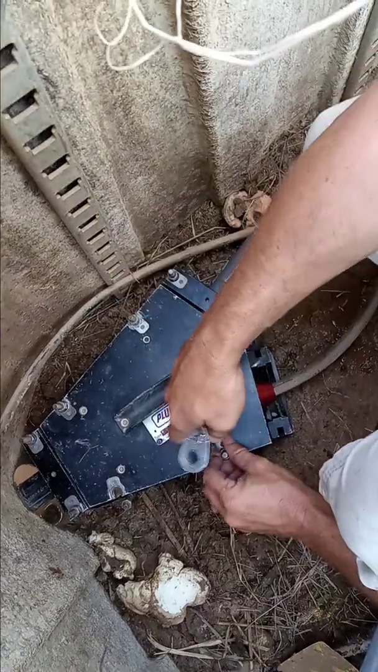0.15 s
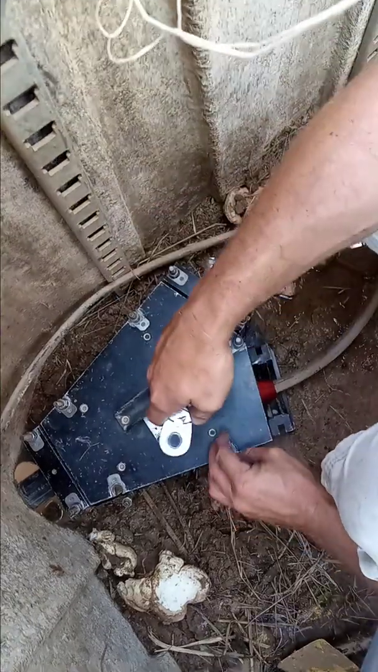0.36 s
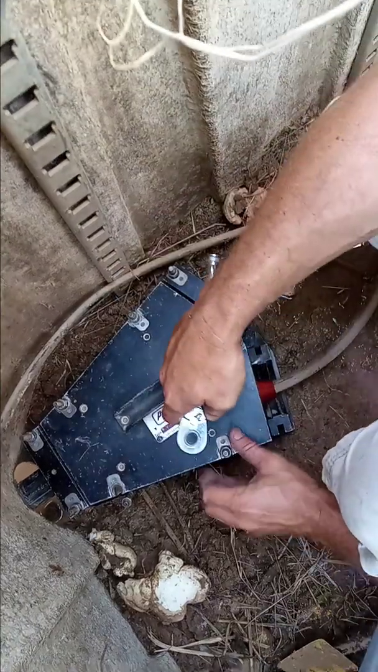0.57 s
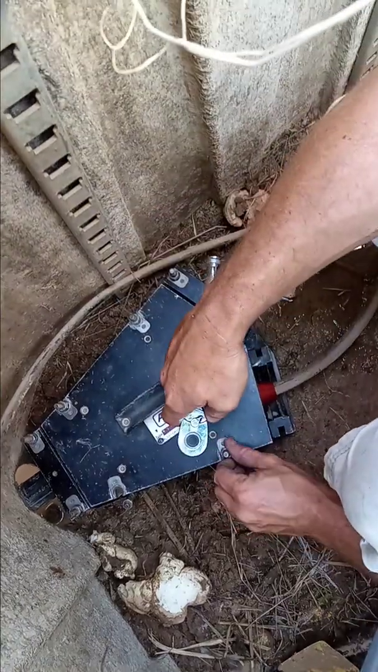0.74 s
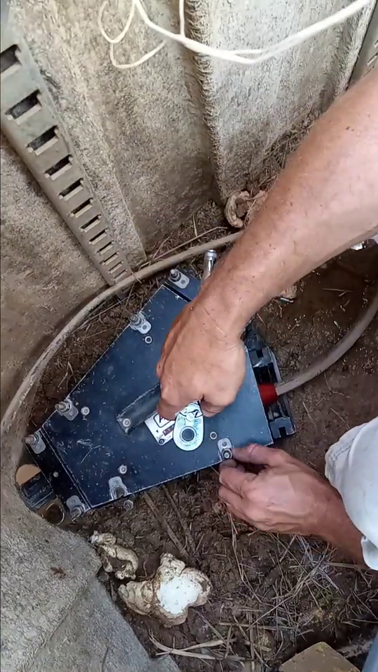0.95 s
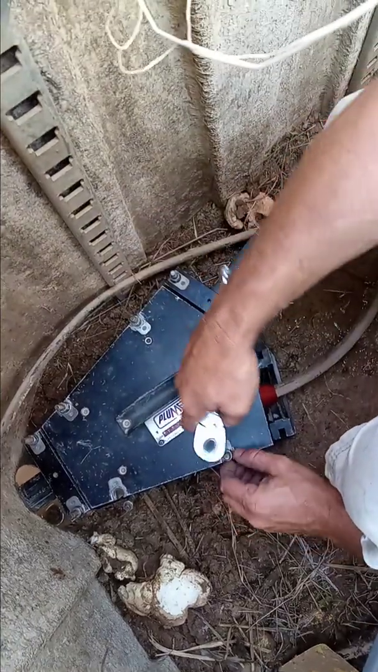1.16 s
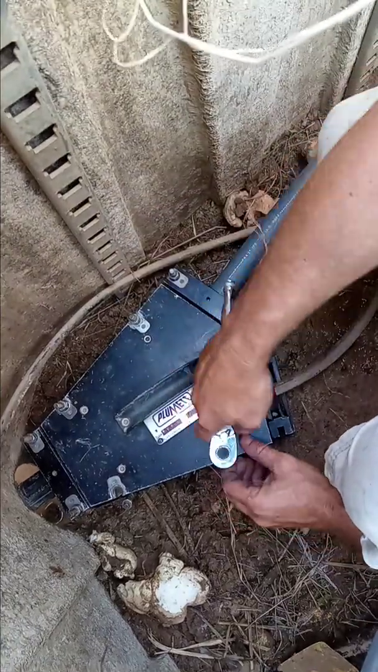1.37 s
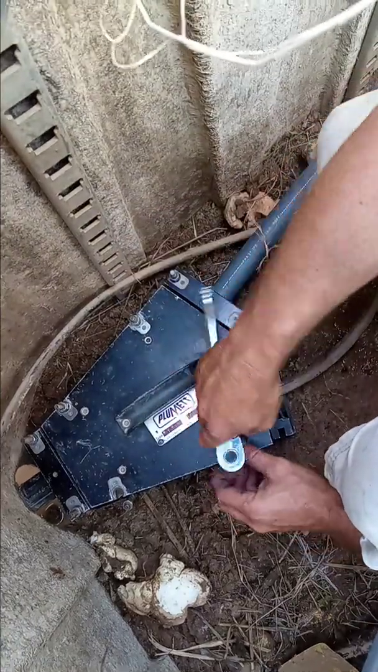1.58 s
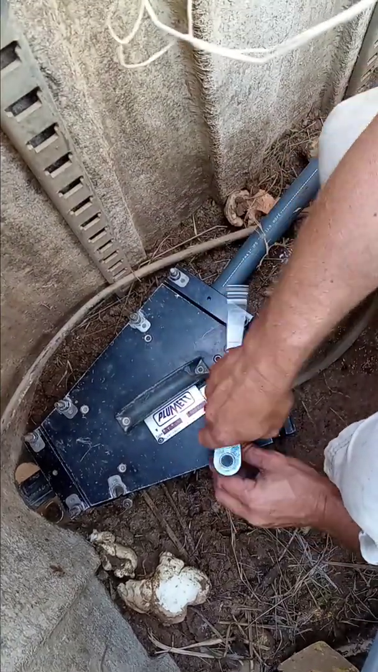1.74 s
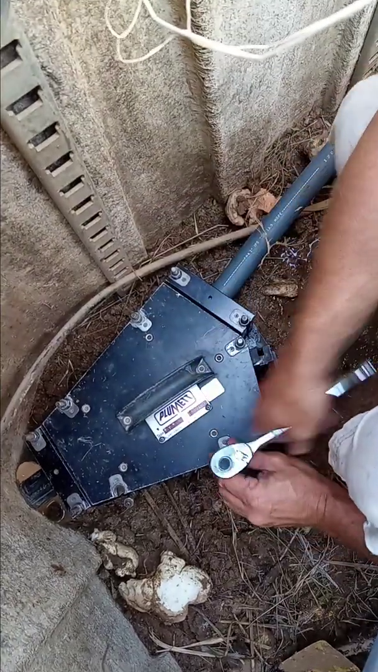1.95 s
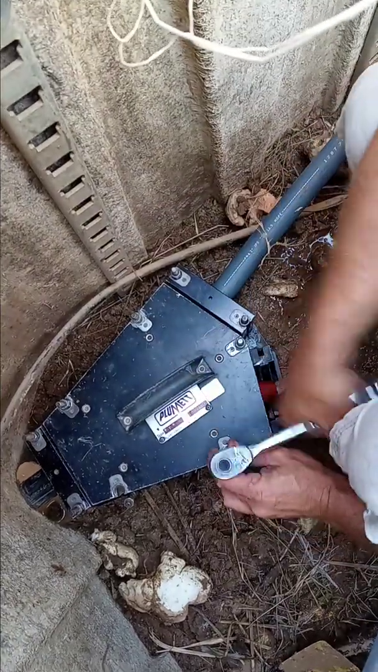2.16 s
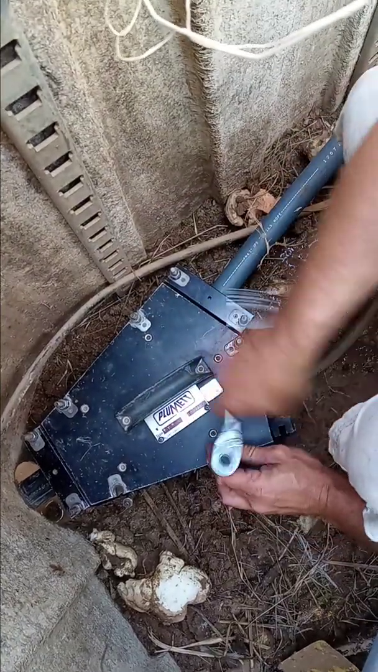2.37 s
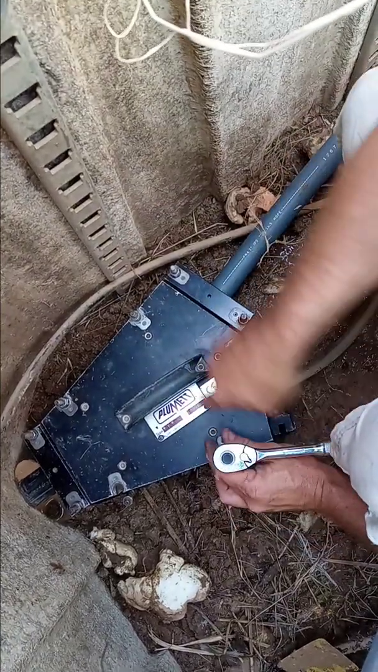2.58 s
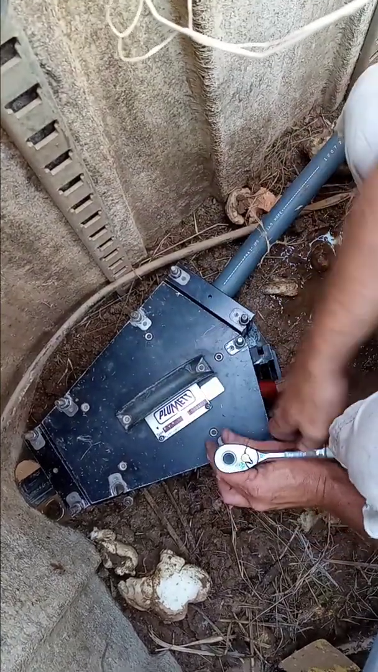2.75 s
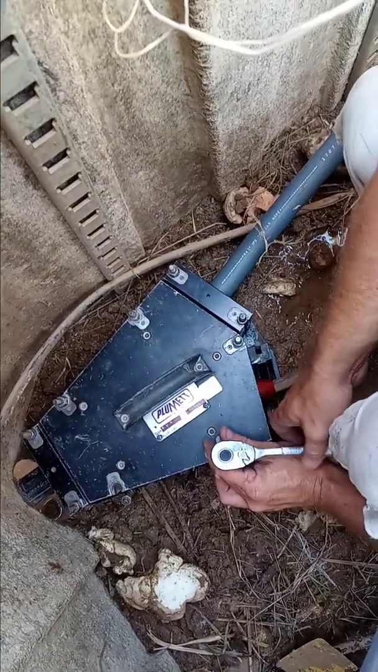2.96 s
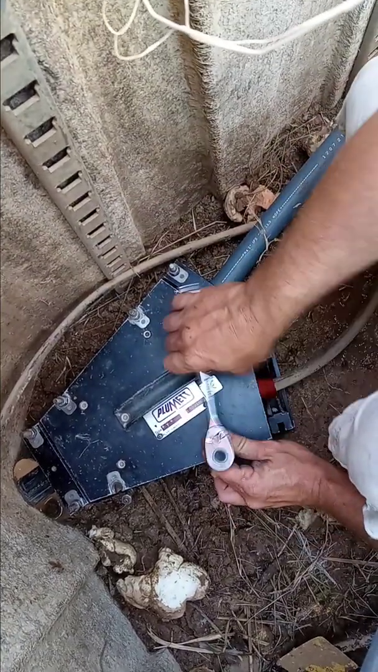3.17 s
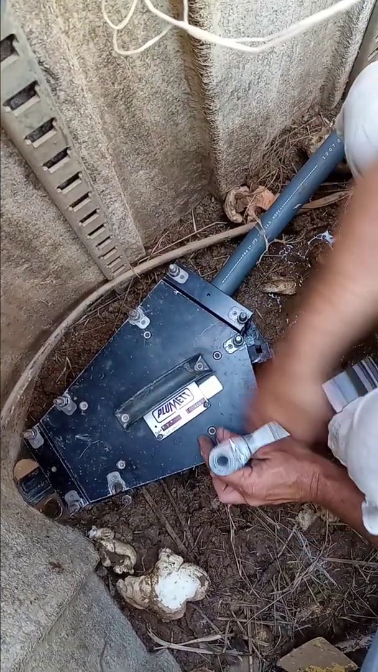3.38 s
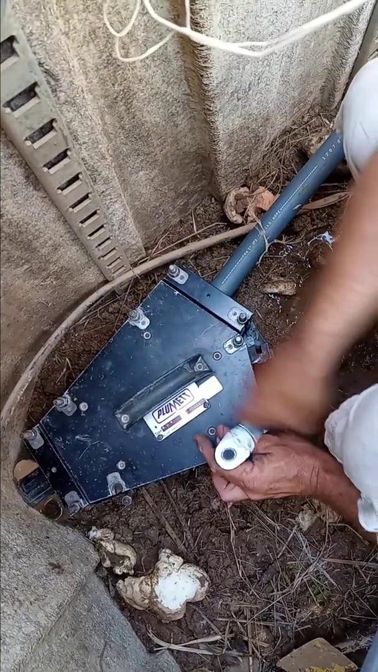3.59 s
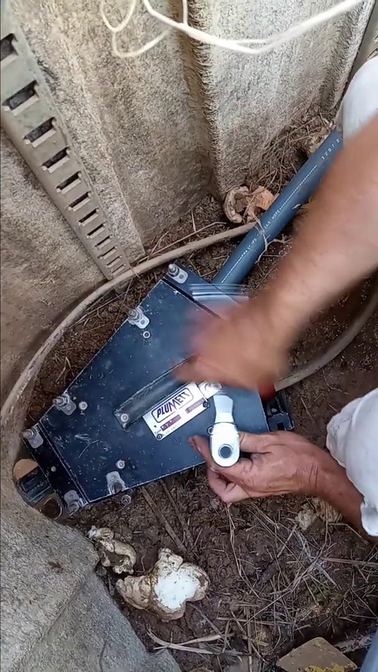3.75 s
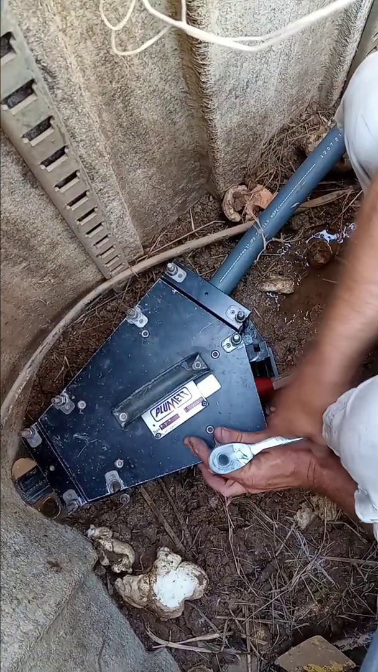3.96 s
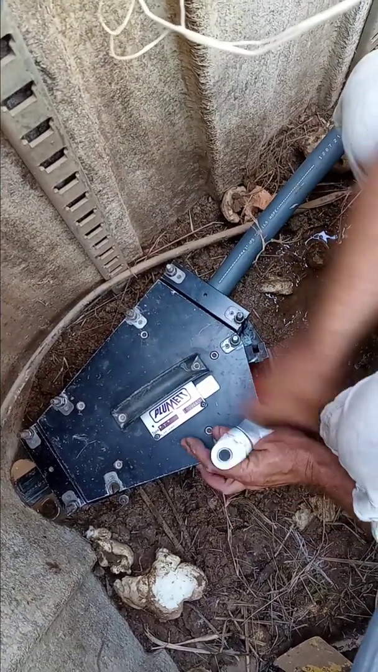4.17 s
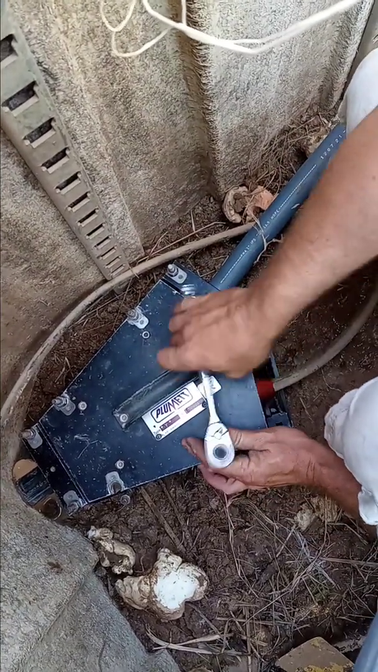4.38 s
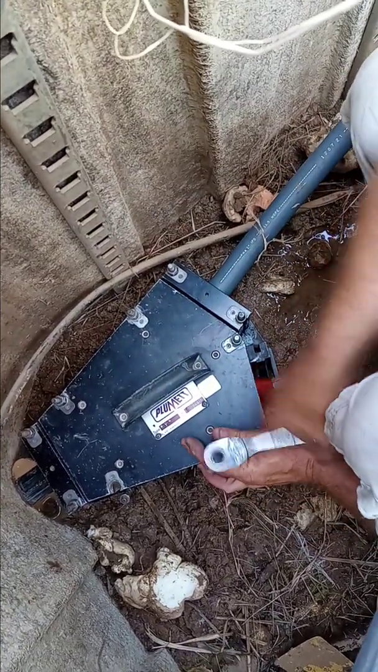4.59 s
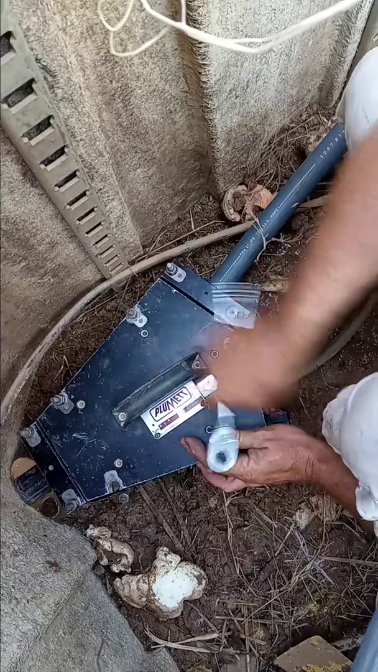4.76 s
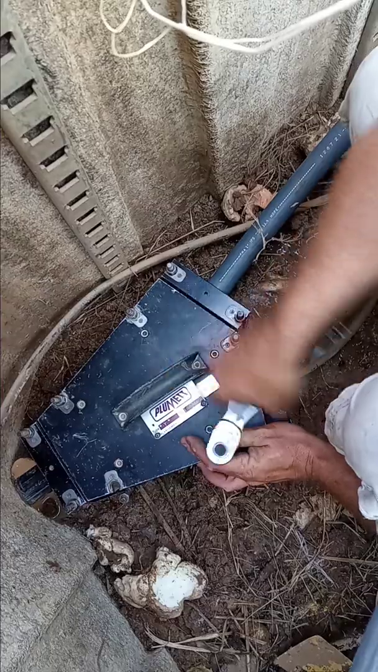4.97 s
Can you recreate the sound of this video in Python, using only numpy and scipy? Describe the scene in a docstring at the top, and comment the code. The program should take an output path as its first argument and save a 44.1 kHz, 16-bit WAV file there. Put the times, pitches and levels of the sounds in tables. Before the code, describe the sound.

A socket clinks and knocks a few times as it is fitted onto a bolt in a machine's lid. Then a hand ratchet starts working, each back swing a short, bright buzz of clicks, with metallic clanks and taps between. The strokes quicken into a steady rhythm. It is heard from just above a narrow outdoor pit, with a slight echo and a faint low drone.

```python
"""Socket ratchet in a pit

A ratchet tightens a bolt on the lid of a machine housing in a narrow pit, heard from a phone above.
The socket clinks onto the bolt, then the handle swings to and fro: the pawl buzzes over the teeth on
each back swing, speeding up and slowing with the hand, and the tool knocks on the lid on each drive
stroke. The pit adds a short echo and a low drone. Two microphone ports colour the sound differently."""
import sys
import numpy as np
from scipy import signal
from scipy.fft import rfft, irfft
from scipy.io import wavfile
from scipy.ndimage import uniform_filter1d

SR = 44100
rng = np.random.default_rng(int(sys.argv[2]) if len(sys.argv) > 2 else 0)


def wav_out(sig):
    """Save sig, one row per channel (or a flat mono array), as 16-bit PCM at SR to the path in sys.argv[1]."""
    wavfile.write(sys.argv[1], SR, np.round(np.clip(np.atleast_2d(sig).T, -1, 1) * 32767).astype(np.int16))


N = 221508
TIME = np.arange(N) / SR


def amp(db):
    return 10 ** (np.asarray(db) / 20)


def unit_energy(x):
    """Scale to a mean energy of one per channel."""
    return x / np.sqrt(np.mean(np.sum(x ** 2, axis=-1)))


def unit_rms(x):
    return x / np.std(x)


def add(track, start_s, sound):
    """Mix a sound into the track."""
    i = max(int(start_s * SR), 0)
    part = sound[..., :max(N - i, 0)]
    track[:, i:i + part.shape[-1]] += part


def convolve(x, impulse):
    """Filter each channel, keeping its length."""
    return signal.fftconvolve(np.atleast_2d(x), np.atleast_2d(impulse), axes=-1)[:, :np.shape(x)[-1]]


def response(spectrum, size=4096):
    """Minimum-phase impulse response from rows of freq_hz, gain_db."""
    hz, db = np.transpose(spectrum)
    bins_hz = np.fft.rfftfreq(size, 1 / SR)
    gain = amp(np.interp(np.log(bins_hz + 1), np.log(hz), db))
    cepstrum = irfft(np.log(gain))
    cepstrum[1:size // 2] *= 2
    cepstrum[size // 2 + 1:] = 0
    return irfft(np.exp(rfft(cepstrum)))[:size // 2]


def resonance(x, hz, width_hz):
    """Two-pole band-pass, unity gain at the centre."""
    return signal.lfilter(*signal.iirpeak(hz, hz / width_hz, fs=SR), x)


def narrow_band(x, hz, width_hz):
    """Two equal resonances in series."""
    return resonance(resonance(x, hz, width_hz), hz, width_hz)


def noise_pair(apart, size):
    """Noise at the two ports: a shared part plus one of their own, scaled by apart."""
    shared, *own = rng.standard_normal((3, size))
    return shared + apart * np.array(own)


def wander(rate_hz):
    """Smooth random drift, unit spread."""
    knots = rng.standard_normal(N // 20)
    return unit_rms(np.interp(TIME * rate_hz, np.arange(len(knots)), knots))


def gate(start_s, end_s):
    """Soft-edged on/off window."""
    return uniform_filter1d(1. * ((TIME > start_s) & (TIME < end_s)), size=3500)


def swells(table, width_hz, gain_db):
    """Resonances driven briefly by noise, faded in and out."""
    out = np.zeros((2, N))
    for start_s, pitch_hz, level_db, length_s in table:
        tone = narrow_band(rng.standard_normal(SR // 4), pitch_hz, width_hz)[-int(length_s * SR):]
        fade = signal.windows.tukey(len(tone), .5)
        add(out, start_s, amp(level_db + gain_db) * unit_rms(tone * fade))
    return out


def burst(t60_s, apart, rise_s, echo_db=-14, echo_t60_s=.07, size=3000):
    """A cloud of short-lived modes, trailed by dense echoes off the close walls."""
    t = TIME[:size]
    decay = np.hypot(amp(-60 * t / t60_s), amp(echo_db - 60 * t / echo_t60_s))
    return noise_pair(apart, size) * decay * (1 - np.exp(-t / rise_s))


def strike(blow, spectrum, lead_hz, width_hz, lead_db):
    """A blow coloured by the struck part, with one resonance leading."""
    sound = convolve(blow, response(spectrum))
    lead = unit_energy(narrow_band(sound, lead_hz, width_hz))
    return unit_energy(unit_energy(sound) + amp(lead_db) * lead)


# Open-air spectrum: freq_hz, gain_db
AIR_SPECTRUM = [(20, -39), (45, -8), (80, -3), (110, 5), (170, 1), (300, -7), (700, -17), (1500, -24),
                (3000, -31.5), (5000, -40.5), (6500, -38.5), (10000, -38), (16000, -45)]

def air(level_db=-53, flutter_db=.7):
    """Faint, even outdoor background."""
    flutter = amp(flutter_db * wander(rate_hz=5))
    noise = convolve(noise_pair(apart=1, size=N), response(AIR_SPECTRUM))
    return unit_rms(noise) * amp(level_db) * flutter


# Drone envelope: time_s, level_db
DRONE_LEVELS = [(0, -46.5), (.28, -42), (1.2, -40.5), (1.9, -49.5), (2.7, -41), (3.5, -49.5), (5.02, -47)]
# Booms in the drone: peak_s, rise_db, length_s
DRONE_BOOMS = [(1.566, 12, 0.084), (2.417, 15, 0.076), (2.527, 11, 0.076), (3.184, 16.5, 0.043),
               (3.35, 14, 0.1), (3.789, 19, 0.032), (4.549, 18.5, 0.064)]

def drone(low_hz=66, high_hz=78, high_db=-5, width_hz=9):
    """Outdoor rumble, narrowed in the pit to two wandering tones that beat."""
    def tone(hz):
        band = narrow_band(rng.standard_normal(N), hz, width_hz)
        return np.cos(np.angle(signal.hilbert(band)))
    level_db = np.interp(TIME, *np.transpose(DRONE_LEVELS))
    for peak_s, rise_db, length_s in DRONE_BOOMS:
        level_db += rise_db * np.exp(-2 * ((TIME - peak_s) / length_s) ** 2)
    return unit_rms(tone(low_hz) + amp(high_db) * tone(high_hz)) * amp(level_db)


def pit(x, level_db=-28, t60_s=.25, rise_s=.0047, size=20000):
    """Add faint, dull reverberation between the pit walls."""
    t = TIME[:size]
    tail = noise_pair(apart=.22, size=size) * amp(-60 * t / t60_s) * (1 - np.exp(-t / rise_s))
    dull_tail = convolve(tail, response([(300, 2.5), (4000, -2), (12000, -50)]))
    return x + amp(level_db) * convolve(x, unit_energy(dull_tail))


# Housing thumps: start_s, pitch_hz, relative_db, length_s
HOUSING_THUMPS = [(0.991, 193, -47, 0.097), (1.368, 346, -40, 0.084), (1.869, 320, -41, 0.1),
                  (2.346, 315, -36.5, 0.038), (2.504, 271, -40, 0.1), (3.381, 494, -27, 0.041),
                  (3.57, 320, -41.5, 0.073), (4.157, 302, -46.5, 0.09), (4.465, 219, -28.5, 0.07),
                  (4.517, 239, -32.5, 0.042)]

def thumps():
    """The hollow housing shifts on its bed."""
    return swells(HOUSING_THUMPS, width_hz=90, gain_db=-2)


# Lid and housing modes: pitch_hz, width_hz, gain_db
LID_MODES = [(503.6, 55, 15.5), (806, 165, -5.5), (1133, 38, 5.5), (1872, 19, 3.5), (2407, 44, -2),
             (3374, 100, -4.5)]

def lid(x):
    """The bolt carries the tool's sound into the lid, which adds its resonances."""
    return x + sum(amp(db) * resonance(x, hz, width_hz) for hz, width_hz, db in LID_MODES)


# Tool squeaks: start_s, pitch_hz, relative_db, length_s
TOOL_SQUEAKS = [(0.001, 2720, -60.5, 0.13), (3.180, 3800, -51.5, 0.029), (3.384, 3890, -40, 0.0126),
                (4.254, 3760, -47, 0.045)]

def squeaks():
    """Socket and wrench head squeak as they turn."""
    return swells(TOOL_SQUEAKS, width_hz=65, gain_db=1.5)


# Spells of friction: start_s, end_s, hiss_relative_db, body_relative_db
RUB_SPELLS = [(0, 0.18, -56.5, -62.5), (1.938, 2.13, -54.5, -50), (2.125, 2.59, -51.5, -52.5),
              (3.178, 5.02, -51.5, -47)]
# Friction hiss spectrum: freq_hz, gain_db
HISS_SPECTRUM = [(900, -16.5), (2000, 1.5), (3000, -6.5), (3700, -1.5), (5000, -12.5), (7000, -16),
                 (11000, -27), (16000, -24)]
# Lid body spectrum, rubbed or struck: freq_hz, gain_db
BODY_SPECTRUM = [(120, -45.5), (300, -3), (480, 1), (900, 6.5), (1300, -1), (2200, -46.5), (5000, -76)]

def rubbing(grain_db=2.3, hiss_gain_db=-2, body_gain_db=-4, swing_hiss_db=9, swing_body_db=5):
    """Grainy friction of thread and socket, louder on the quick back swings."""
    grains = noise_pair(apart=.85, size=N) * amp(grain_db * wander(rate_hz=260))
    swinging = sum(gate(start_s, end_s) for start_s, end_s, *_ in BACK_SWINGS)
    hiss = unit_rms(convolve(grains, response(HISS_SPECTRUM)))
    body = unit_rms(convolve(grains, response(BODY_SPECTRUM)))
    hiss *= amp(hiss_gain_db + swing_hiss_db * swinging)
    body *= amp(body_gain_db + swing_body_db * swinging)
    return sum(gate(start_s, end_s) * (amp(hiss_db) * hiss + amp(body_db) * body)
               for start_s, end_s, hiss_db, body_db in RUB_SPELLS)


# Steel head modes: pitch_hz, t60_s, relative_db
WRENCH_MODES = [(3700, 0.065, -11), (3762, 0.046, -11), (4615, 0.022, -19), (5760, 0.01, -18.5),
                (6635, 0.057, -11.5), (6540, 0.055, -42), (7074, 0.02, -14), (9580, 0.01, -14)]

def wrench_ring(detune=.004, rise_s=.0014, size=3000):
    """The steel head rings; grip and load shift its modes slightly from blow to blow."""
    hz, t60_s, db = np.transpose(WRENCH_MODES)[:, :, None]
    t = TIME[:size]
    hz = hz * (1 + detune * rng.standard_normal(hz.shape))
    modes = np.exp((2j * np.pi * hz - np.log(1000) / t60_s) * t) * (1 - np.exp(-t / rise_s))
    modes *= amp(db) / np.linalg.norm(modes.real, axis=1, keepdims=True)
    port_phases = np.exp(2j * np.pi * rng.random((2, len(hz))))
    return (port_phases @ modes).real


# Socket clank spectrum: freq_hz, gain_db
CLANK_SPECTRUM = [(500, -15), (1200, -3), (1900, -1.5), (2700, -5), (3400, -2.5), (4200, -12),
                  (7000, -20.5), (14000, -64)]
# Wrench tick spectrum: freq_hz, gain_db
TICK_SPECTRUM = [(2000, 13.5), (4500, 9), (6500, 11.5), (9000, 7), (12000, 5.5), (16000, -71)]

def knock(blow_db, tick_offset_db, clank_hz, clank_gain_db=13.5, tick_gain_db=8.5, ring_db=-2):
    """One blow thuds in the lid, clanks in the socket and ticks in the wrench."""
    thud_hz = 981 if rng.random() < .4 else 491  # one of the lid's two drum notes leads
    thud_burst = burst(t60_s=.059, apart=.37, rise_s=.00087)
    thud = strike(thud_burst, BODY_SPECTRUM, thud_hz, width_hz=110, lead_db=-8.5)
    clank_burst = burst(t60_s=.033, apart=1, rise_s=.00051, echo_db=-.5)
    clank = strike(clank_burst, CLANK_SPECTRUM, clank_hz, width_hz=1040, lead_db=-8)
    tick_burst = burst(t60_s=.048, apart=.79, rise_s=.0005)
    tick = unit_energy(convolve(tick_burst, response(TICK_SPECTRUM))) + amp(ring_db) * wrench_ring()
    metal = amp(clank_gain_db) * clank + amp(tick_offset_db + tick_gain_db) * tick
    # The thud is strongest under low clanks and grows more slowly with force than the clank.
    thud_db = 5.5 + .67 * blow_db - 20 * np.log2(clank_hz / 2000)
    return amp(thud_db) * thud + amp(blow_db) * metal


# Blows on bolt and lid, pitch set by the spot struck: start_s, blow_db, tick_offset_db, clank_hz
TOOL_BLOWS = [(0.4307, -26, -1, 1860), (0.4409, -32, -8, 1920), (0.633, -24.5, -25, 2180),
              (0.7845, -53.5, -30, 2160), (1.2023, -19, -17, 3200), (1.2317, -22.5, -7, 2300),
              (1.286, -17.5, -8.5, 2440), (1.3581, -28, -16, 1610), (1.5, -37.5, -37, 3200),
              (1.718, -34, -2.5, 2380), (1.8654, -13.5, -7.5, 2170), (2.3388, -26.5, -9, 2250),
              (2.365, -22, -16, 1920), (2.49, -31, 4.5, 3100), (2.4992, -22, -29, 1750),
              (3.2207, -30, -2, 1750), (3.248, -17, 0.5, 2190), (3.3071, -28, 10.5, 1600),
              (3.3445, -30.5, 3, 1600), (3.5035, -14, -8, 2330), (3.541, -31.5, -9, 1660),
              (3.566, -21, 5, 2370), (3.6039, -20.5, 2.5, 1780), (3.6529, -20.5, -1.5, 1698),
              (3.7908, -21, -32, 1850), (3.8262, -29.5, -10, 2200), (3.8518, -25.5, -0.5, 1630),
              (3.8589, -24.5, 9, 3060), (3.9158, -27, 6, 3500), (3.9525, -28.5, 9, 3830),
              (4.1064, -28, -28, 1720), (4.115, -23.5, 4.5, 3400), (4.1493, -20.5, 6.5, 3850),
              (4.157, -22, 7, 3400), (4.2036, -29.5, 12, 3600), (4.2511, -24.5, 0.5, 3520),
              (4.442, -23, -5, 3200), (4.4583, -20, 9, 3270), (4.5094, -29, 0, 1850),
              (4.5578, -26.5, 11.5, 2400), (4.6962, -21, -33, 2150), (4.7703, -18.5, 3, 3620),
              (4.813, -28.5, 0.5, 2050), (4.8909, -21, -25, 2000)]

def knocks(throw_fraction=.52):
    """Seating and drive-stroke knocks; each back swing also throws the loose socket against the bolt."""
    out = np.zeros((2, N))
    for start_s, blow_db, tick_offset_db, clank_hz in TOOL_BLOWS:
        add(out, start_s, knock(blow_db, tick_offset_db, clank_hz))
    for start_s, end_s, *_ in BACK_SWINGS:
        throw_s = start_s + throw_fraction * (end_s - start_s)
        add(out, throw_s, knock(blow_db=-25, tick_offset_db=-1, clank_hz=3400))
    return out


# Pawl snap spectrum: freq_hz, gain_db
SNAP_SPECTRUM = [(150, -24), (450, -2.5), (900, 2), (1500, -3), (3000, 6.5), (4600, -2.5), (6500, 2.5),
                 (9000, 6), (12000, 10.5), (16000, -6)]

def tooth(ring_db):
    """One drop of the pawl: a snap and the ring it leaves."""
    snap_burst = burst(t60_s=.012, apart=1, rise_s=.0008, echo_db=-13)
    snap = convolve(snap_burst, response(SNAP_SPECTRUM, size=1024))
    return unit_energy(snap) + amp(ring_db) * wrench_ring()


# Handle back swings: start_s, end_s, tooth_count, ease (0 even speed, 1 rest to rest), relative_db
BACK_SWINGS = [(2.0955, 2.3008, 20, 1, -21.5), (2.9778, 3.1542, 22, 0.4, -21.5),
               (3.371, 3.4778, 16, 0.51, -22), (3.6815, 3.7616, 15, 0.63, -20),
               (3.979, 4.0698, 17, 0.58, -21), (4.2794, 4.372, 16, .5, -20.5),
               (4.5967, 4.675, 15, 0.32, -21.5), (4.9036, 4.996, 16, 0.25, -19)]

def pawl(gain_db=13.5, first_db=2.5, speed_db=1, scatter_db=6, jitter_s=.001,
         ring_db=-5, ring_growth_db=6):
    """The sprung pawl drops off each tooth: hard off the first, fastest mid swing, as the ring builds."""
    out = np.zeros((2, N))
    for start_s, end_s, tooth_count, ease, relative_db in BACK_SWINGS:
        travel = np.linspace(0, 1, tooth_count)
        time_fraction = travel + ease * (np.arccos(1 - 2 * travel) / np.pi - travel)
        speed = np.sin(np.pi * travel)
        lateness, hardness = rng.uniform(-1, 1, (tooth_count, 2)).T
        times_s = start_s + (end_s - start_s) * time_fraction + jitter_s * lateness * speed
        levels_db = relative_db + gain_db + speed_db * ease ** 2 * speed + scatter_db * hardness
        levels_db[0] += first_db
        rings_db = ring_db + ring_growth_db * travel * np.sqrt(abs(speed))
        for time_s, level_db, tooth_ring_db in zip(times_s, levels_db, rings_db):
            add(out, time_s, amp(level_db) * tooth(tooth_ring_db))
    return out


def scene():
    """Tool and lid in the pit, over its drone and the open air."""
    tool = lid(knocks() + pawl() + rubbing()) + squeaks()
    return pit(tool) + thumps() + drone() + air()


# Left microphone port response: freq_hz, gain_db
LEFT_RESPONSE = [(60, 0.5), (520, 2.5), (650, 2), (800, 5), (1200, 1.5), (1450, 5.5), (1900, 9), (7000, 13),
                 (8500, 5.5), (10500, -12.5), (13000, -24), (15000, 0.5)]
# Right microphone port response: freq_hz, gain_db
RIGHT_RESPONSE = [(60, -8), (350, -6), (500, -6), (630, -6), (800, -2), (1150, -5), (1600, -11), (2000, -7),
                  (2600, -0.5), (3600, -4), (4600, 5), (8000, 2.5), (9500, 10), (13000, -10.5), (15000, 12)]

def record(dry, lag_samples=42, cutoff_hz=16100):
    """Each port has its own colour, the left lies further off, and the top is cut."""
    left, right = convolve(dry, [response(LEFT_RESPONSE), response(RIGHT_RESPONSE)])
    left = np.pad(left, (lag_samples, 0))[:N]
    lowpass = signal.ellip(10, .2, 80, cutoff_hz, fs=SR, output="sos")
    return signal.sosfilt(lowpass, [left, right])


dry = scene()
out = record(dry)
wav_out(out)
```